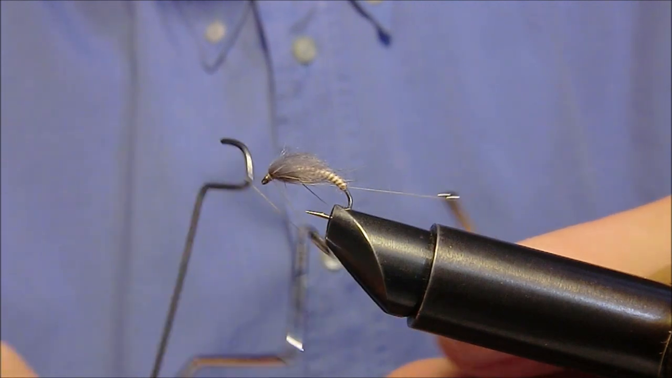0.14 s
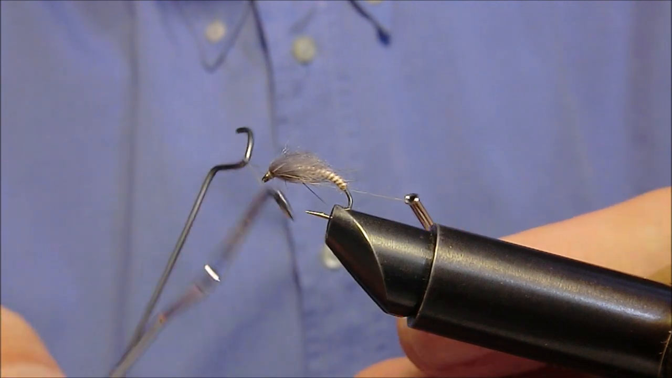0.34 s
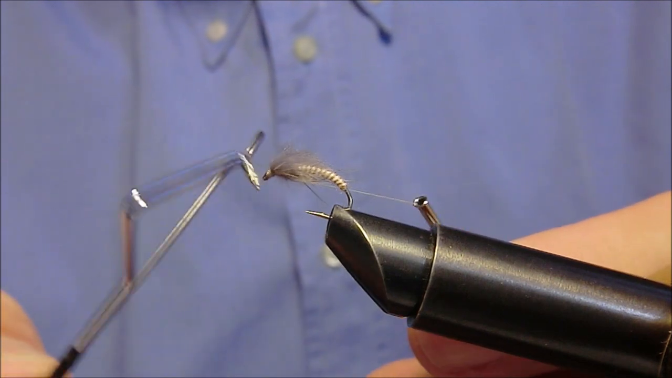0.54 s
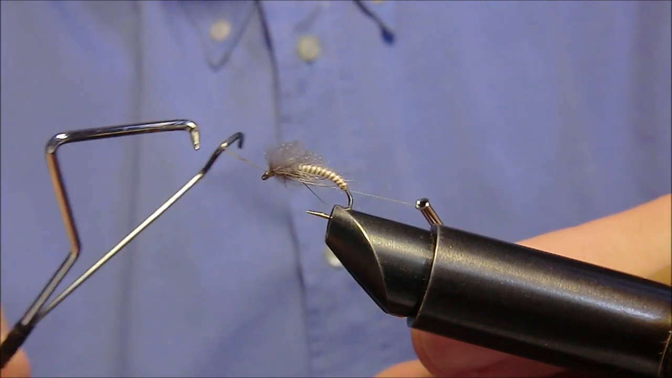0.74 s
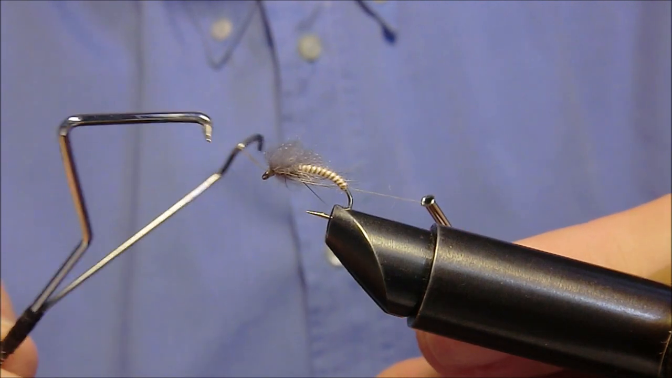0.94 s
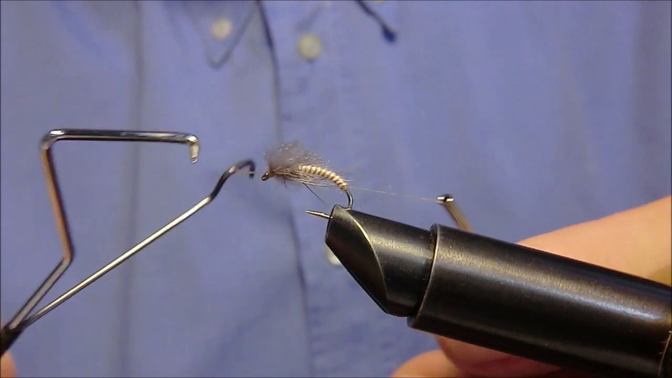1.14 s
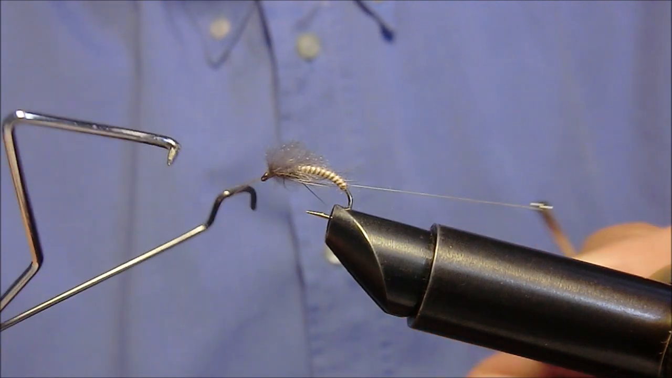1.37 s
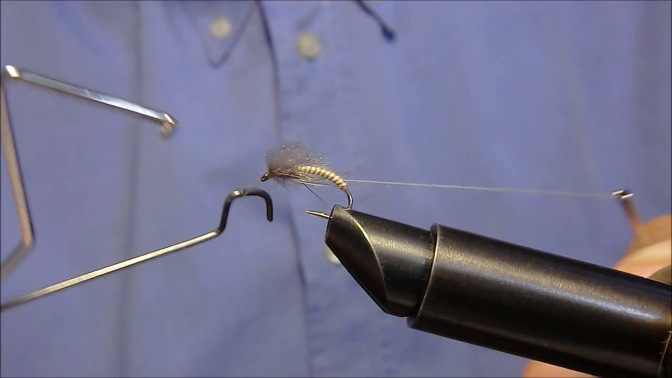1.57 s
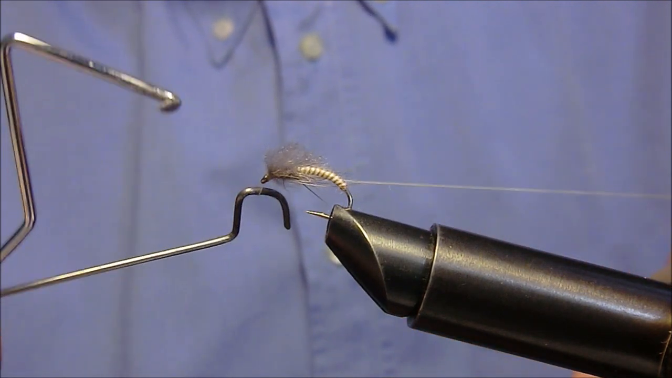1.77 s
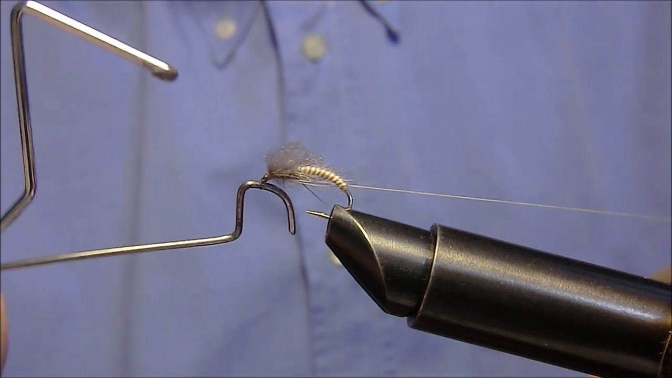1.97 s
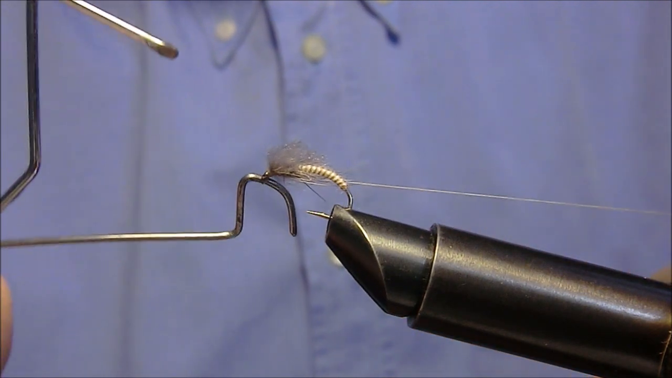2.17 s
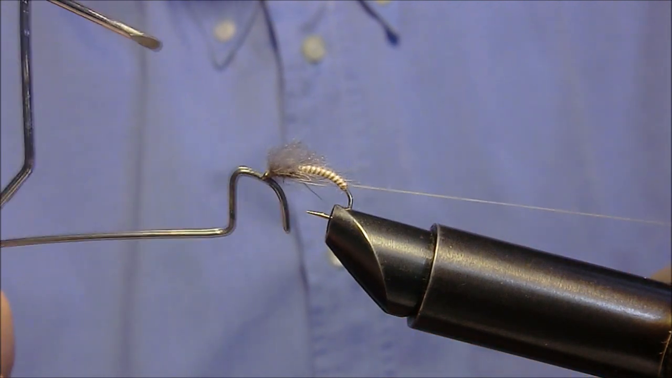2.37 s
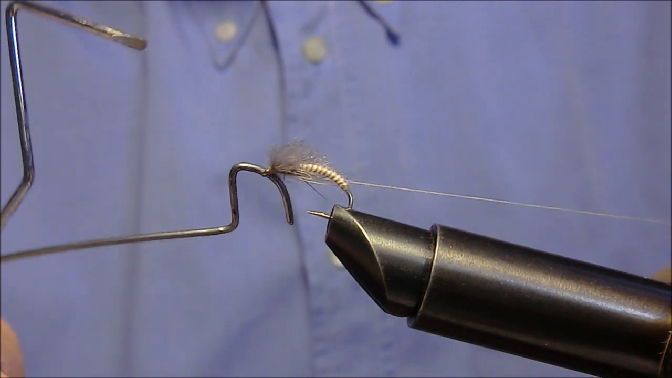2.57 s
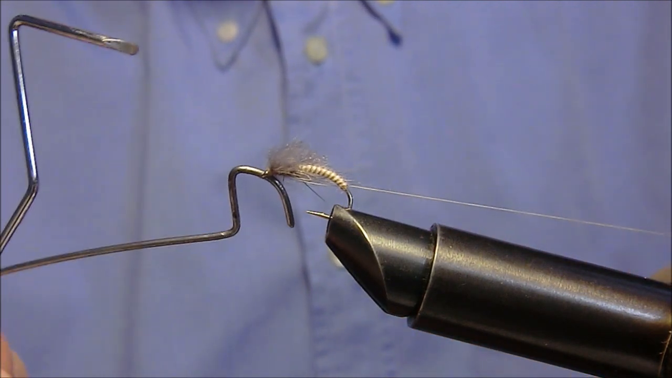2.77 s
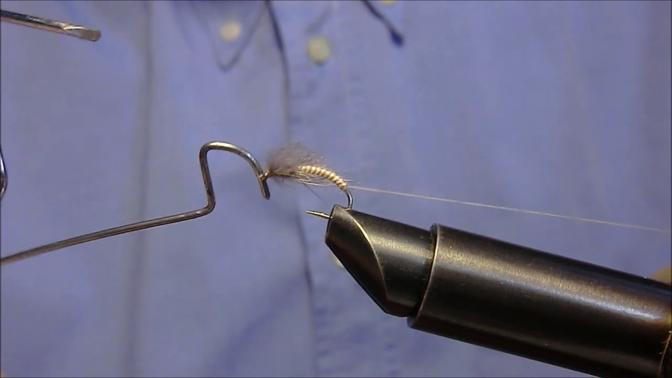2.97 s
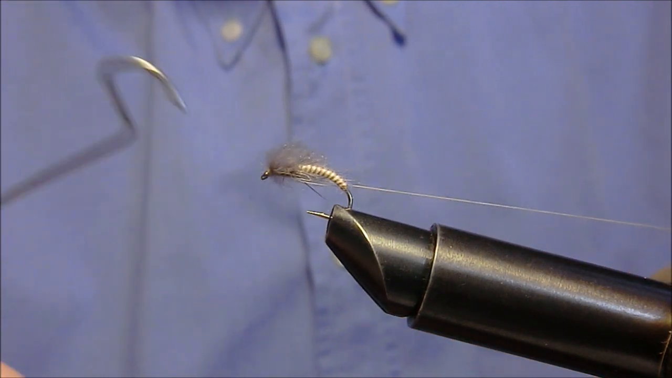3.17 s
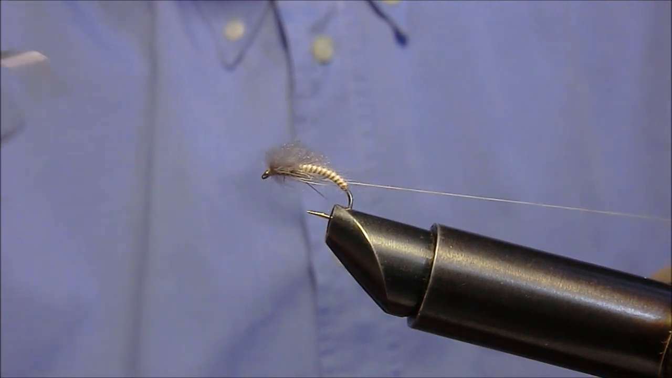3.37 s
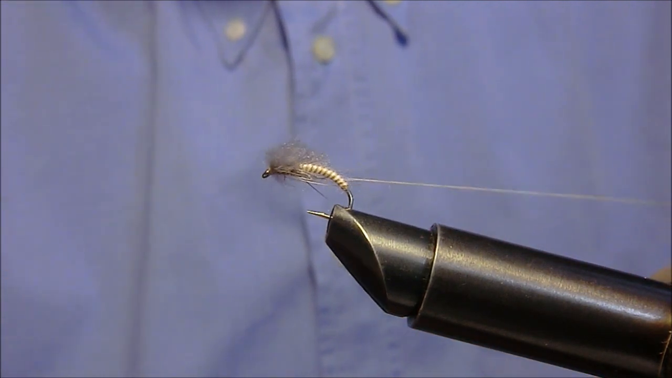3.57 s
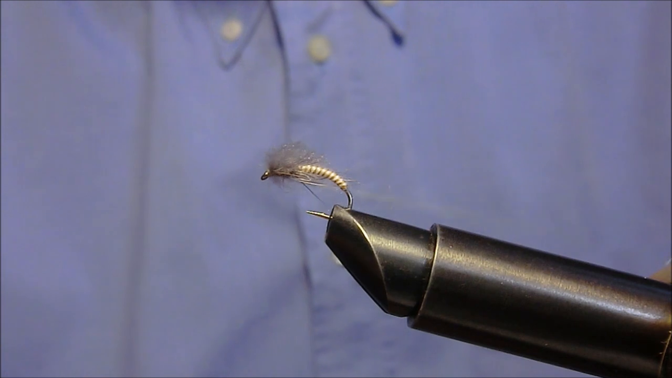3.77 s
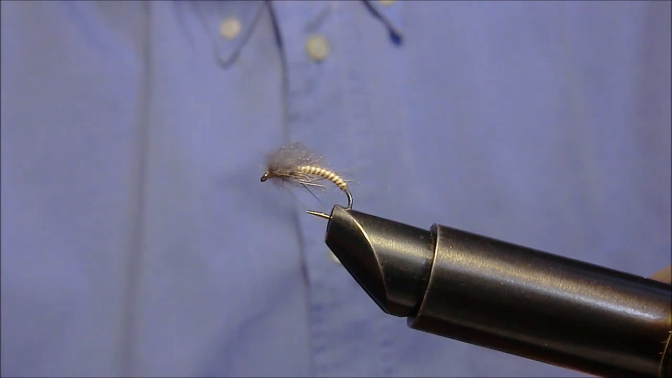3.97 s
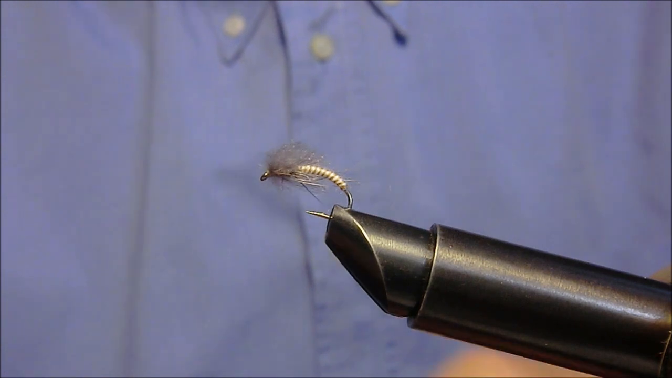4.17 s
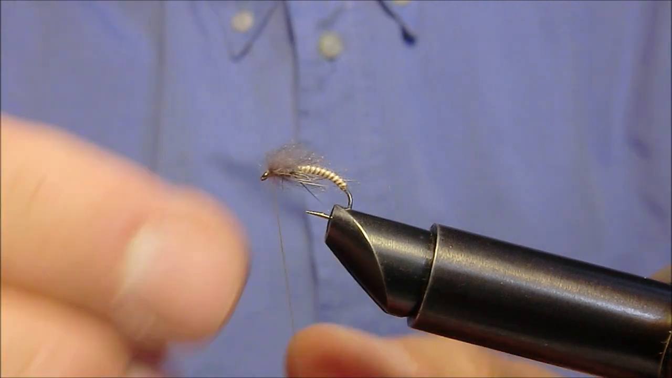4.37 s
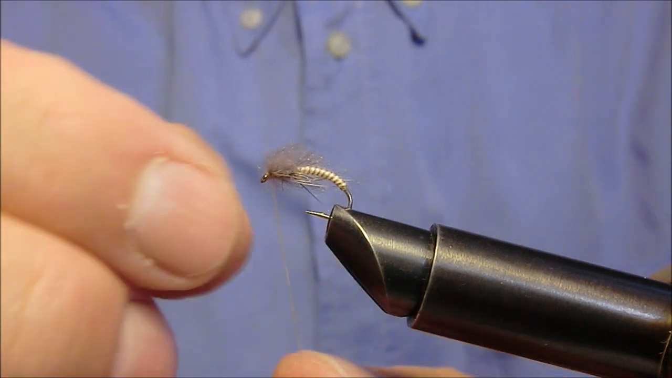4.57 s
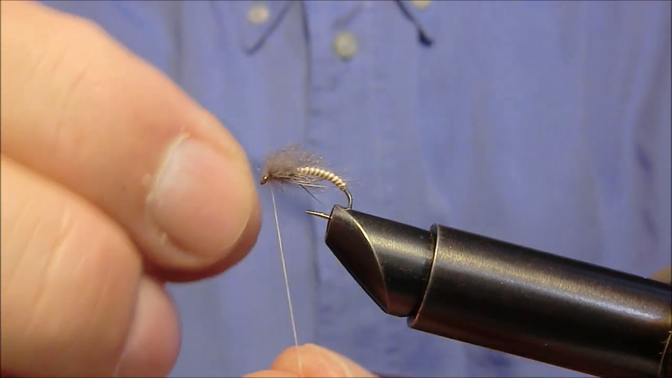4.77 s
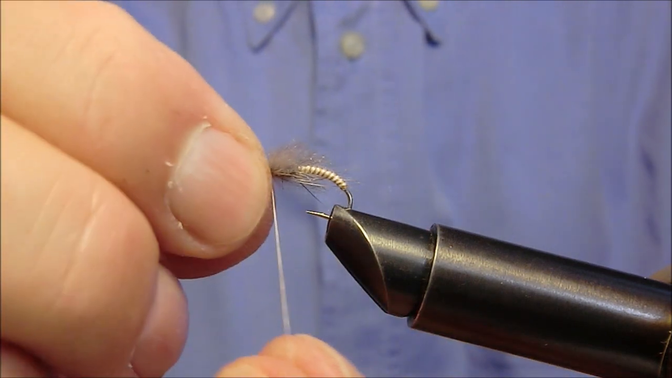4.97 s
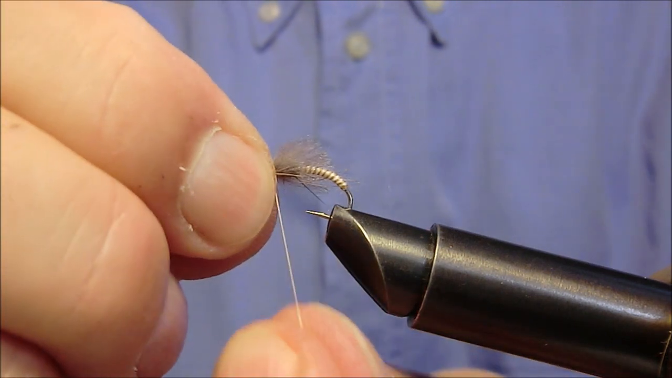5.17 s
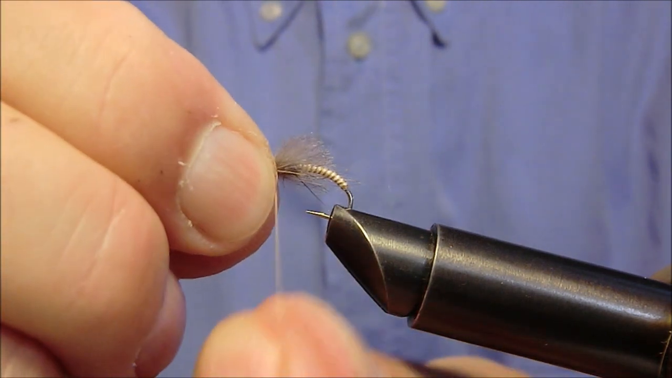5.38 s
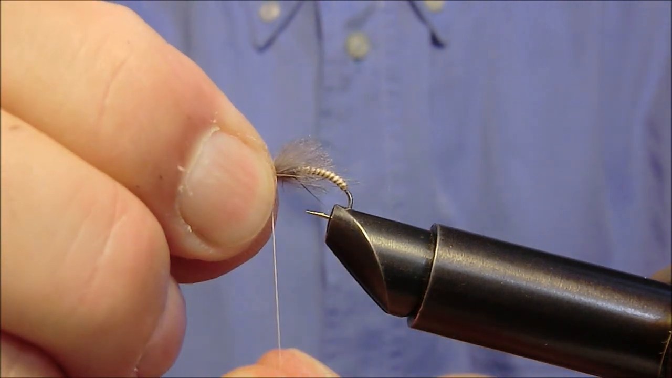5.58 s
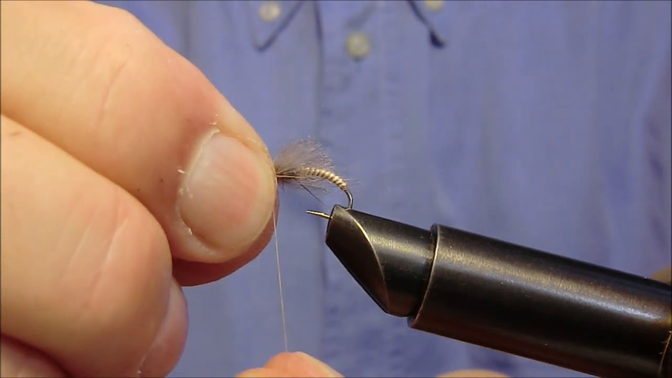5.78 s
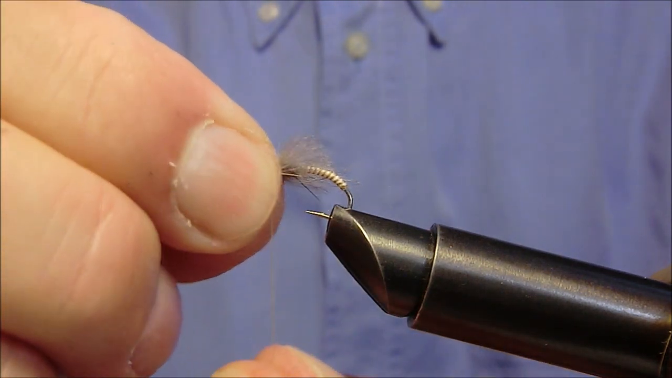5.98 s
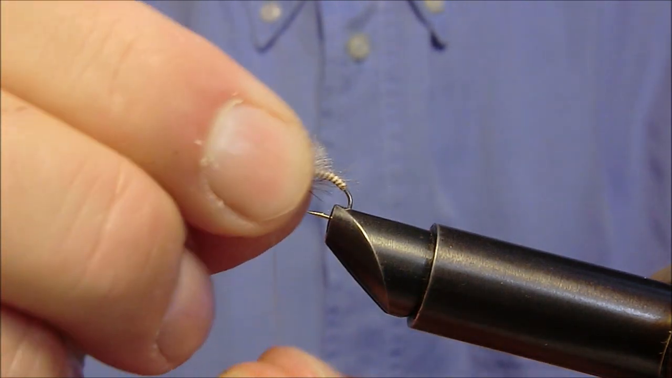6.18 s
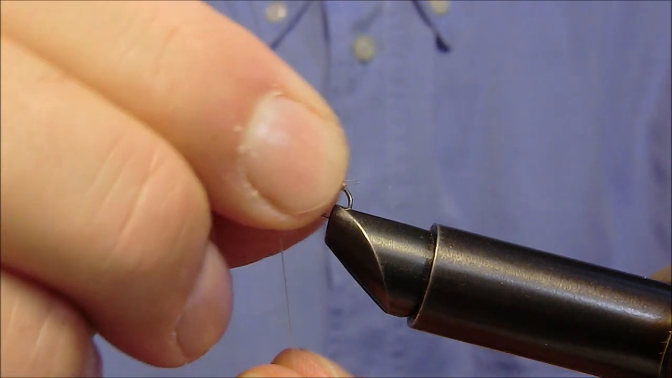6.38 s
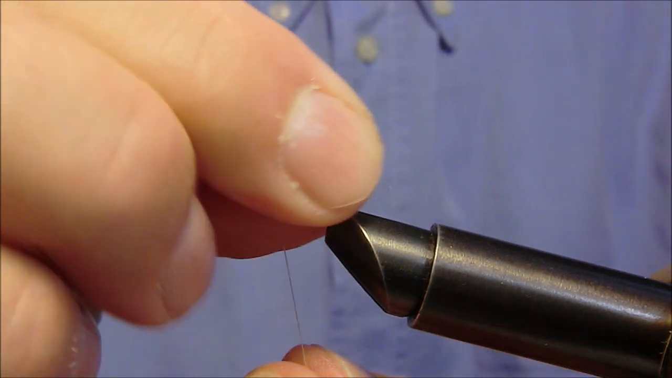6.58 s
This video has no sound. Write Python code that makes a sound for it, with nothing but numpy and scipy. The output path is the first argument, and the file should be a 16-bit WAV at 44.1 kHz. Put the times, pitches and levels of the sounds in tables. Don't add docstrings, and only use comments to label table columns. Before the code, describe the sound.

A quiet indoor room with soft low room tone and preamp hiss, heard close on a single camera microphone, the same in both channels. At 0.1 s a thin steel tool gives a small crisp click on a hook, preceded by faint touches. At 0.62 s sprung wire lets go with a brighter twang, thin and fluttering, with small rebounds just after. Hiss alone until faint ticks at 2.3 and 2.46 s. At 2.88 s a tool knocks the vise, with a low bench thump, followed by drier knocks around 3.17 to 3.21 s. A slight thump at 3.99 s leads to the loudest sound, at 4.05 s: a hard, bright snap with clattering bounces lasting under a tenth of a second, plus a short room tail. The hiss sinks at once, then gradually recovers from about 4.5 to 6.4 s. Barely audible ticks come at 4.84 and 5.14 s; quiet hiss to the end.

```python
import sys
import numpy as np
from scipy import signal
from scipy.fft import rfft, irfft, next_fast_len
from scipy.io import wavfile

SR = 44100
rng = np.random.default_rng(int(sys.argv[2]) if len(sys.argv) > 2 else 0)


def volts_from_decibels(level):
    exponent = np.asarray(level, float) / 20
    return 10 ** exponent


def put_to_file(sound):
    columns = np.atleast_2d(sound).T
    safe = np.clip(columns, -1, 1)
    whole_steps = np.round(safe * 32767)
    wavfile.write(sys.argv[1], SR, whole_steps.astype(np.int16))


N = 292074

# start_s, level_db, ring_db, thump_db
SNAP_CONTACTS = [(3.9875, -27.5, -32, -17), (4.022, -55.5, -0.5, -40), (4.0494, -2.5, -34, -44),
                 (4.0575, -24, -30.5, -45), (4.0589, -7, -13.5, -42), (4.0648, -8, -31.5, -50),
                 (4.0905, -16, -26, -50), (4.1036, -28, -30, -50), (4.114, -30, -38, -54),
                 (4.1154, -16.5, -4, -41), (4.1206, -21, -9, -52), (4.1222, -17, -4.5, -33)]
# freq_hz, density_db_per_hz
SNAP_CRACK = [(100, -19.5), (350, -20), (660, -5), (2300, -4), (3900, -6.5), (4300, -7.5), (5650, -2.5),
              (6300, -2), (7100, 5), (8600, 4), (10000, -5.5), (12000, -9), (14000, -10.5), (16500, -21.5)]
# pitch_hz, level_db, t60_s
SNAP_RING = [(7300, 0, .012), (7600, 0, .015), (8300, -3, .01), (11050, -32, .2), (12800, -30, .08),
             (3700, -24, .03), (190, -22, .08), (350, -26, .14), (600, -16, .05)]


def snap():
    return contacts(SNAP_CONTACTS, SNAP_CRACK, SNAP_RING,
                    t60_s=.012, dull_db=.19, flutter_db=3, room_db=-7)


# start_s, level_db, ring_db, thump_db
HOOK_CONTACTS = [
    (.0575, -41, -27, -19),
    (.0932, -31.5, -17, -30),
    (.1028, -35, -26, -20),
    (.1059, -14.5, -30, -27.5),
    (.1073, -26.5, -15, -30),
]
# freq_hz, density_db_per_hz
HOOK_CRACK = [(300, -21), (1200, -21), (2300, -7), (2900, 5), (3700, -10), (5000, 1), (6600, -11.5),
              (8500, 7.5), (11400, -16), (13600, 3), (16500, -29)]
# pitch_hz, level_db, t60_s
HOOK_RING = [(703, -2.5, 0.089), (1905, -21, 0.21), (2528, -6, 0.28), (2970, -1, 0.039), (3300, -8, 0.12),
             (4240, -12, 0.052), (5500, -8, 0.097), (8060, -3, 0.021), (9430, -12, 0.069),
             (10950, -13, 0.06)]


def hook():
    return contacts(HOOK_CONTACTS, HOOK_CRACK, HOOK_RING,
                    t60_s=.006, dull_db=.22, flutter_db=5, room_db=-16)


# start_s, level_db, ring_db, thump_db
TWANG_CONTACTS = [
    (.6168, -13.5, -23, -30),
    (.637, -28, -25, -30),
    (.6518, -29.5, -10, -19),
    (.6528, -19.5, -26, -38),
]
# freq_hz, density_db_per_hz
TWANG_CRACK = [(200, -17), (500, -9), (750, -11), (1050, -20.5), (1600, -2.5), (2400, -0.5), (3100, -1.5),
               (4000, -8.5), (5600, 1), (7500, -9), (11000, -18.5), (13800, -28), (15100, -17),
               (16500, -32)]
# pitch_hz, level_db, t60_s
TWANG_RING = [(1810, -17, .1), (2471, -10, .6), (2520, -12, .2), (2735, -20, .25), (3100, -17, .25),
              (3340, -16, .2), (4590, -14, .06), (5450, -3, .025), (6090, -10, .2), (6220, -9, .22),
              (6370, -11, .2), (9570, -18, .06)]


def twang():
    return contacts(TWANG_CONTACTS, TWANG_CRACK, TWANG_RING,
                    t60_s=.023, dull_db=.23, flutter_db=6, room_db=-14)


# start_s, level_db, ring_db, thump_db
VISE_CONTACTS = [
    (2.8785, -23, -33, -11),
    (3.1672, -28.5, -40, -19),
    (3.2083, -30.5, -25, -15.5),
    (3.2131, -26.5, -16, -22),
]
# freq_hz, density_db_per_hz
VISE_CRACK = [(470, -10), (800, -0.5), (2560, -1.5), (5350, 7), (7620, -5), (9570, -0.5), (11400, -16),
              (15500, -21), (16500, -65)]
# pitch_hz, level_db, t60_s
VISE_RING = [(3440, -18, .1), (5465, -13, .27), (5440, 0, .04), (9600, -14, .03)]


def vise():
    return contacts(VISE_CONTACTS, VISE_CRACK, VISE_RING,
                    t60_s=.012, dull_db=-.12, flutter_db=1.5, room_db=-10)


# start_s, level_db, ring_db, thump_db
TICK_CONTACTS = [
    (2.311, -41.5, -26, -32),
    (2.4645, -33, -34, -17),
    (4.841, -40.5, -34, -31),
    (5.1395, -40, -32.5, -30),
]
# freq_hz, density_db_per_hz
TICK_CRACK = [(800, -50), (2500, -16.5), (4500, -13), (6100, -4.5), (7900, -18), (9700, -7.5), (12500, -36),
              (15000, -31)]


def ticks():
    return contacts(TICK_CONTACTS, TICK_CRACK, VISE_RING,
                    t60_s=.011, dull_db=1.7, flutter_db=1, room_db=-11)


SPIKE = 3.1


def contacts(rows, crack_colour, modes, t60_s, dull_db, flutter_db, room_db):
    out = np.zeros(N + 2 * SR)
    t = np.arange(SR // 2) / SR
    short = t[:4096]
    touch = 1. * (short == 0)
    rest = (0, len(t) - len(short))
    hz = np.fft.rfftfreq(2 ** 13, 1 / SR)
    loudest_db = max(row[1] for row in rows)
    for start_s, level_db, ring_db, thump_db in rows:
        tilt_db = dull_db * (level_db - loudest_db)
        colour_db = along(crack_colour, hz) + tilt_db * np.log2((hz + 100) / 4000)
        rattle = volts_from_decibels(-60 * short / t60_s) * rng.standard_normal(len(short))
        crack = coloured(rattle + SPIKE * touch, colour_db)
        crack /= np.abs(crack).max()
        spread = coloured(touch, colour_db)
        spread *= np.linalg.norm(crack) / np.linalg.norm(spread)
        ring = ringing(modes, t, scatter_db=4, flutter_db=flutter_db) * (1 - np.exp(-t / .00017))
        body = volts_from_decibels(ring_db) * ring + volts_from_decibels(thump_db) * bench_thump(t)
        direct = volts_from_decibels(level_db) * (np.pad(crack, rest) + body)
        wet = volts_from_decibels(level_db + room_db) * room_answer(np.pad(spread, rest) + body)
        start = round(start_s * SR)
        out[start:start + len(direct)] += direct
        out[start:start + len(wet)] += wet
    return out[:N]


def ringing(modes, t, scatter_db, flutter_db):
    hz, db, t60_s = np.transpose(modes)[:, :, None]
    strength, phase = rng.standard_normal((2, len(modes), 1))
    knots = rng.standard_normal((len(modes), 64))
    flutter = np.array([np.interp(t * 120, np.arange(64), k) for k in knots])
    level_db = db + scatter_db * strength + flutter_db * flutter - 60 * t / t60_s
    return np.sum(volts_from_decibels(level_db) * np.sin(2 * np.pi * hz * t + phase), axis=0)


# pitch_hz, level_db, t60_s
BENCH = [(89, -6, 0.36), (285, -7, 0.51), (315, -7.5, 0.15), (183, -19, 0.16), (365, -16.5, 0.27),
         (465, -9, 0.048), (721, -10, 0.083)]


def bench_thump(t):
    return ringing(BENCH, t, scatter_db=2.5, flutter_db=.4) * (1 - np.exp(-t / .002))


def along(points, hz):
    f, v = np.transpose(points)
    return np.interp(np.log(hz + 1), np.log(f + 1), v)


def coloured(x, gain_db):
    size = 2 * (len(gain_db) - 1)
    cepstrum = irfft(np.log(np.maximum(volts_from_decibels(gain_db), 1e-5)), size)
    cepstrum[1:size // 2] *= 2
    cepstrum[size // 2 + 1:] = 0
    response = np.exp(rfft(cepstrum))
    return irfft(rfft(x, size) * response, size)[:len(x)]


def below(x, top_hz):
    n = x.shape[-1]
    size = next_fast_len(n + 8192)
    passed = np.fft.rfftfreq(size, 1 / SR) < top_hz
    return irfft(rfft(x, size) * passed, size)[..., :n]


# freq_hz, t60_s
ROOM = [(150, 0.97), (700, 0.6), (2000, 0.57), (5000, 0.54), (8000, 0.46), (14000, 0.2)]
# freq_hz, gain_db
AIR = [(100, -13), (500, -0.5), (4000, 0.5), (8000, -10.5), (11000, -8.5), (16000, -25)]
HISS_TOP_HZ = 15850


def room_answer(blow):
    hz, t, z = signal.stft(rng.standard_normal(SR // 2), SR, nperseg=256)
    gain_db = along(AIR, hz)[:, None] - 60 * t / along(ROOM, hz)[:, None]
    tail = signal.istft(z * volts_from_decibels(gain_db), SR, nperseg=256)[1]
    tail = below(tail, HISS_TOP_HZ)
    delayed = np.pad(blow, (130, 0))
    return signal.fftconvolve(delayed, tail / np.linalg.norm(tail))


# freq_hz, density_db_per_hz
HISS = [(12, -39), (20, -9), (76, -1), (153, -3), (191, -4), (268, -6), (537, -10), (635, -10.5),
        (1020, -15), (1430, -16.5), (5750, -23.5), (12200, -24), (15700, -26.5)]
HISS_DB = -54


def hiss():
    size = next_fast_len(N + 8192)
    hz = np.fft.rfftfreq(size, 1 / SR)
    gain = volts_from_decibels(along(HISS, np.minimum(hz, 15500))) * (hz < HISS_TOP_HZ)
    x = irfft(rfft(rng.standard_normal(size)) * gain, size)[:N]
    return volts_from_decibels(HISS_DB) * x / x.std()


DUCK_DB, DUCK_S, HOLD_S, RECOVER_DB_PER_S = -8, .18, .4, 4


def gain_control():
    loudest_s = max(SNAP_CONTACTS, key=lambda row: row[1])[0]
    since_s = np.maximum(np.arange(N) / SR - loudest_s, 0)
    sunk_db = DUCK_DB * (1 - np.exp(-since_s / DUCK_S))
    climb_db = RECOVER_DB_PER_S * np.maximum(since_s - HOLD_S, 0)
    return volts_from_decibels(np.minimum(sunk_db + climb_db, 0))


# centre_s, threshold_db (over the median line), after_click (0/1)
THINNED = [(.1223, 8, 1), (.6557, -2, 0), (1.978, 6, 0), (2.896, 15, 1), (2.917, 9, 0), (3.728, 6, 0),
           (4.005, 14, 1), (4.282, 10, 0), (5.221, 7.5, 0), (5.392, 8, 0), (5.648, 7.5, 0), (6.309, 6.5, 0)]


def thin_out(x):
    out = x.copy()
    u = np.linspace(0, 1, round(SR * 2048 / 48000))
    late_rise = np.where(u < .5, np.clip((u - 7 / 32) * 8, 0, .5), u)
    for centre_s, threshold_db, after_click in THINNED:
        window = np.sin(np.pi * (late_rise if after_click else u))
        start = round(centre_s * SR) - len(u) // 2
        span = slice(start, start + len(u))
        lines = rfft(x[:, span] * window)
        weak = np.abs(lines) < volts_from_decibels(threshold_db) * np.median(np.abs(lines))
        out[:, span] -= window * irfft(lines * weak, len(u))
    return out


def scene():
    mono = snap() + hook() + twang() + vise() + ticks() + hiss()
    return np.tile(mono, (2, 1))


def band_limit(x):
    return signal.sosfilt(signal.butter(12, 17080, fs=SR, output="sos"), x)


def record(dry):
    mix = below(dry * gain_control(), top_hz=16500)
    return band_limit(thin_out(mix))


dry = scene()
out = record(dry)
put_to_file(out)
```